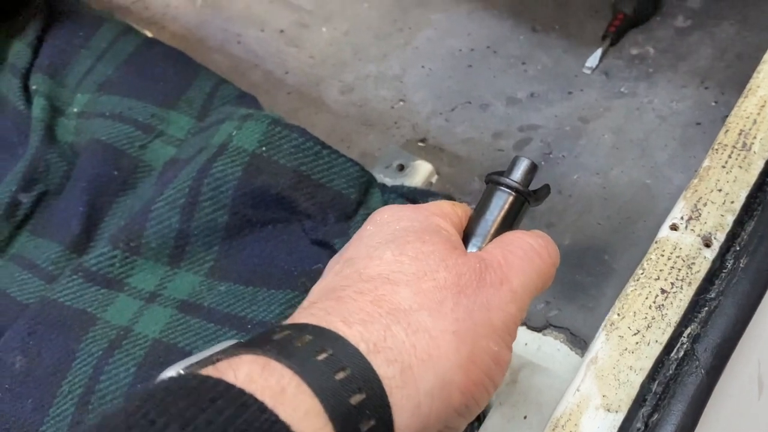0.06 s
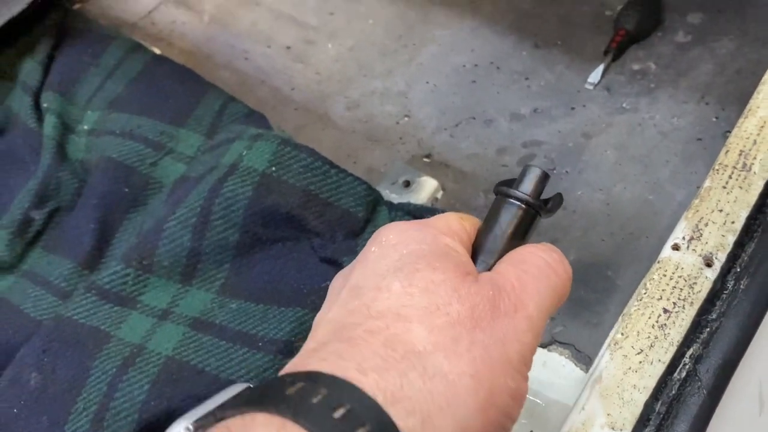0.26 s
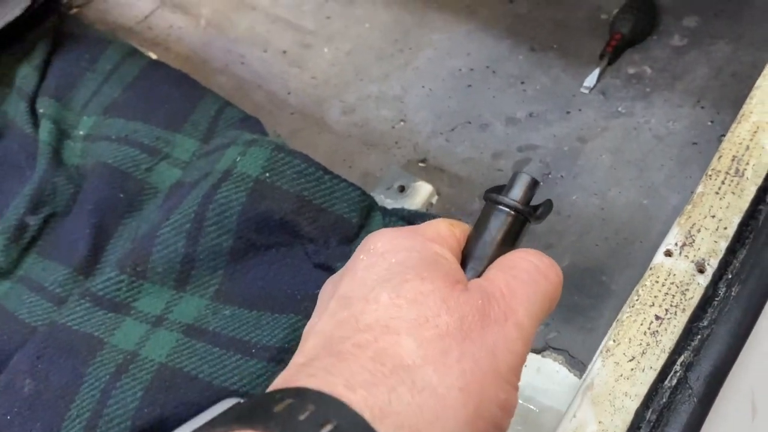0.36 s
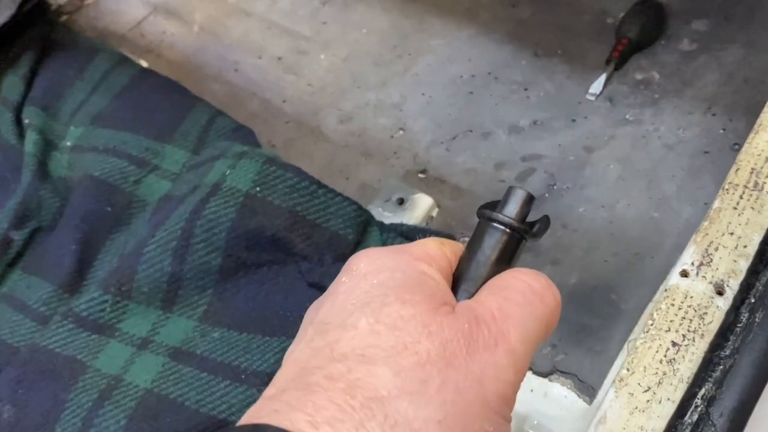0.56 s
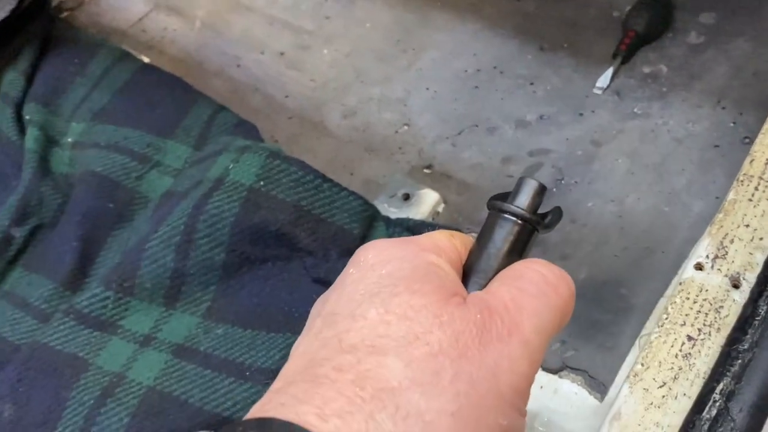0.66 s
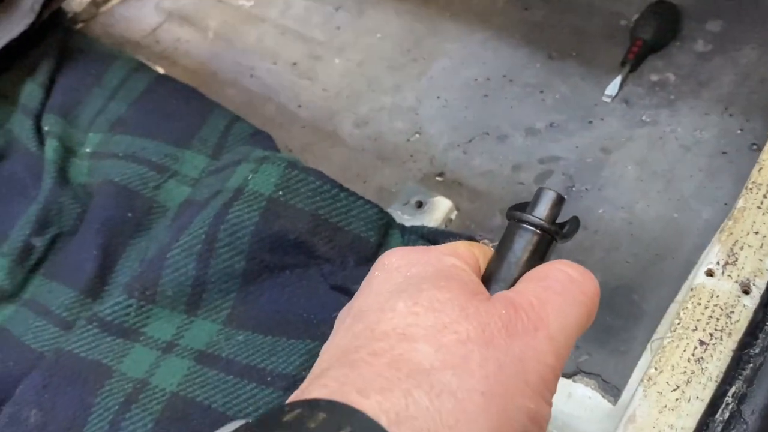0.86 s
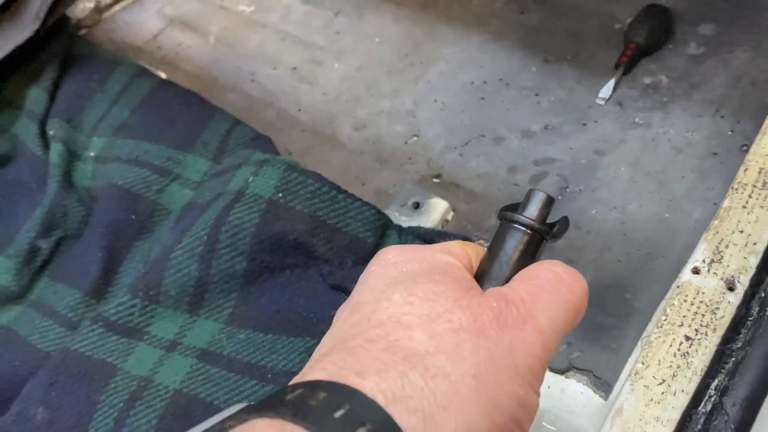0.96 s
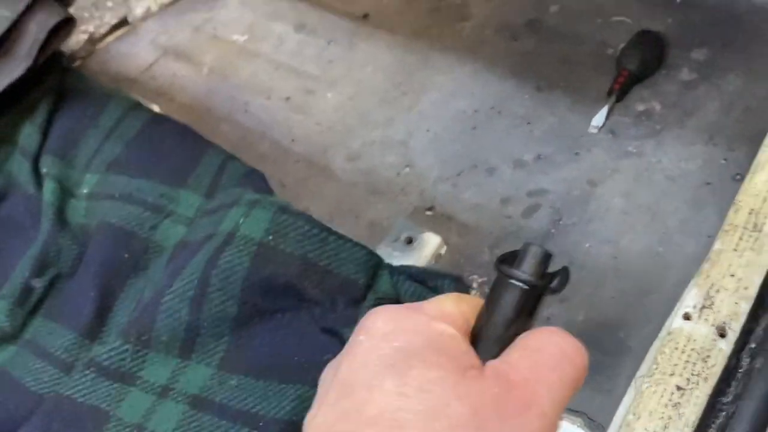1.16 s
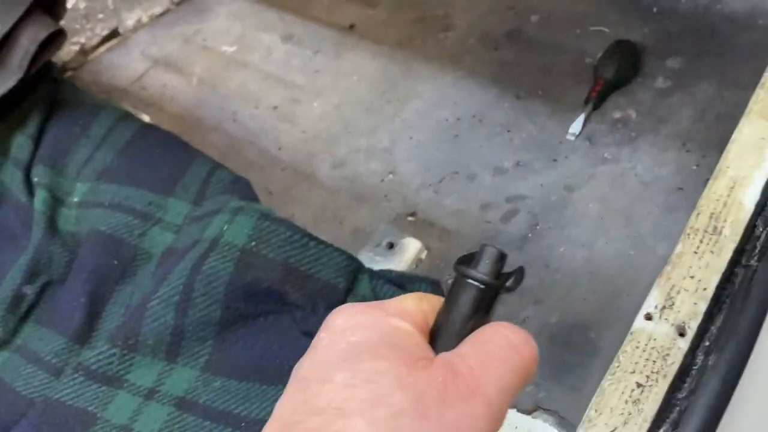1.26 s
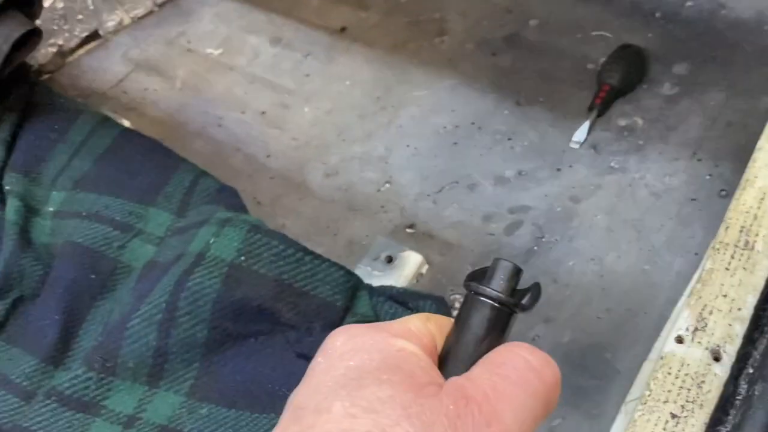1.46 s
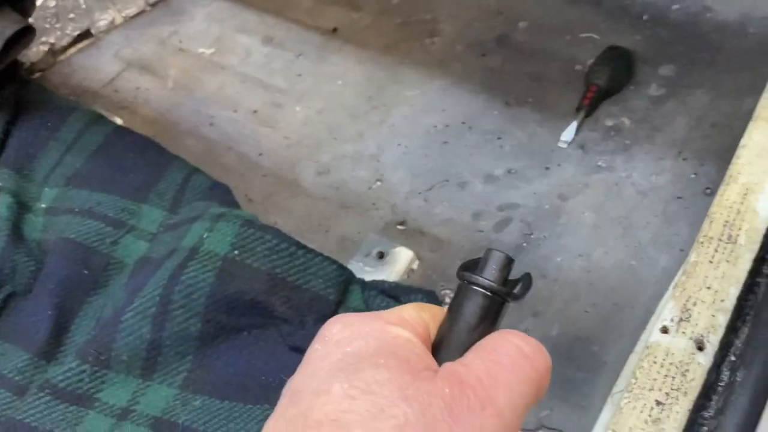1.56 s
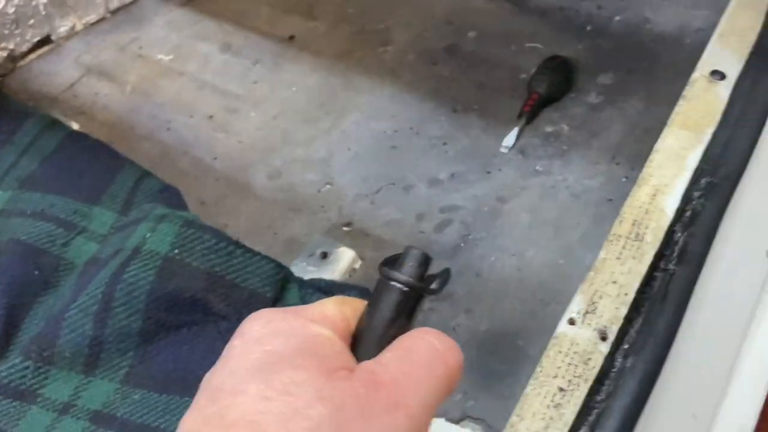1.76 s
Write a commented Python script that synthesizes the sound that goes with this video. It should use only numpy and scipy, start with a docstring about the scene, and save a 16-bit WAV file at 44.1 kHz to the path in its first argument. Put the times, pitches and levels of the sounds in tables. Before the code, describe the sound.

Close, hard metallic clack early on, its bright crack quickly damped over a hollow metal floor knock; afterwards only quiet cloth rubbing, tiny taps and low handling thuds, strongest past the middle, in a quiet workshop.

```python
"""In a workshop, a steel lever snaps over its catch once, close to a hand-held camera.
The catch rings briefly with a burst of noise, the sheet-metal floor pan booms, and the room answers.
Sleeve and blanket rustle as the arm moves, and the camera is bumped in the hand.
A few faint ticks and taps fall in between. Metal is made of decaying sines, cloth and room of shaped
noise, bumps of swelling low sines."""
import sys
import numpy as np
from scipy import signal
from scipy.fft import rfft, irfft, next_fast_len
from scipy.io import wavfile
from scipy.ndimage import uniform_filter1d, map_coordinates

SR = 44100
rng = np.random.default_rng(int(sys.argv[2]) if len(sys.argv) > 2 else 0)


def convert_level_to_amplitude(level_db):
    """Map a level in decibels to its linear amplitude factor."""
    exponent = np.asarray(level_db, float) / 20
    return 10 ** exponent


def persist_wave(psi):
    """Save psi, clipped to +-1, as 16-bit WAV."""
    counts = np.round(np.clip(psi, -1, 1) * 32767).astype(np.int16)
    wavfile.write(sys.argv[1], SR, np.atleast_2d(counts).T)


N = 79380  # samples in the scene
T = np.arange(SR // 2) / SR  # half a second of time for each short sound (s)

# cloth rustle over time, in two pieces, before CLOTH_DB and MISSING_BANDS: t/s, level/dB
RUSTLE_LEVEL = [
    [(0.0, -71.5), (0.088, -67.5), (0.144, -67), (0.152, -63.5), (0.172, -69.5), (0.192, -69), (0.22, -67)],
    [(0.44, -70.5), (0.454, -75), (0.476, -79.5), (0.48, -76.5), (0.614, -72.5), (0.636, -76.5),
     (0.72, -82), (0.75, -72), (0.788, -67), (0.936, -74), (1.086, -59.5), (1.174, -66.5), (1.25, -69),
     (1.336, -76.5), (1.348, -75), (1.378, -78), (1.408, -75), (1.424, -80.5), (1.648, -64.5), (1.8, -70.5)],
]
# relative spectrum of the cloth rustle, before MISSING_BANDS: f/Hz, level/dB
CLOTH_SPECTRUM = [(120, -35.5), (200, -5.5), (761, -4.5), (961, -9), (1680, -3.5), (3030, -11), (6200, -13),
                  (8200, -18), (10700, -48), (18000, -120)][:-2] + [(10500, -17.5), (12500, -23.5),
                  (14000, -66)]
# treble bands in which the rustle as heard is nearly silent or weaker, not due to the cloth: f/Hz, level/dB
MISSING_BANDS = [(8250, 0), (8450, -45), (9600, -45), (9800, 0), (11900, 0), (12300, -14)]
CLOTH_DB = 7.5  # added to the rustle levels
# low-mid rubbing over time: t/s, level/dB
RUBBING_LEVEL = [(0, -66), (.08, -58), (.11, -58), (.16, -57), (.22, -54), (.46, -66.5), (.58, -67.5),
                 (.72, -71), (.86, -71), (.9, -62), (.96, -69), (1.08, -63), (1.15, -60.5), (1.3, -72.5),
                 (1.45, -70), (1.52, -65.5), (1.57, -68.5), (1.67, -57), (1.74, -60.5), (1.8, -67)]
# relative spectrum of the rubbing: f/Hz, level/dB
RUBBING_SPECTRUM = [(120, -19.5), (200, 0), (400, 0.5), (900, -5.5), (1800, -14), (2500, -18.5),
                    (4000, -71)]
# handling rumble over time: t/s, level/dB
HANDLING_LEVEL = [(0, -47), (.07, -60.5), (.19, -44), (.29, -56.5), (.45, -57), (.55, -63.5), (.67, -54.5),
                  (.82, -59), (.98, -56.5), (1.1, -51.5), (1.2, -42), (1.33, -54.5), (1.43, -59),
                  (1.6, -57.5), (1.72, -45), (1.8, -55)]
# relative spectrum of the handling rumble: f/Hz, level/dB
RUMBLE_SPECTRUM = [(12, -57), (20, -18), (59, -2), (75, -1.5), (108, -7.5), (142, -10.5), (172, -21),
                   (221, -12.5), (300, -27), (390, -62.5), (660, -120)]
# how alike left and right are in the movement noises: f/Hz, correlation (-1 to 1)
LIKENESS = [(60, 0.88), (140, 0.89), (350, 0.32), (850, 0.48), (2050, -0.33), (4940, 0.4), (12000, 0.71)]
# left-right balance of the movement noises: f/Hz, left minus right level/dB
BALANCE = [(60, 1.5), (230, 0.0), (850, -2), (3180, -2.0), (12000, 1.5)]

# bumps of the camera in the hand: t/s, level/dB, f/Hz of the fundamental, extra overtone level/dB
BUMPS = [(0.131, -42, 86.5, 4), (0.169, -37, 74, 2.5), (0.199, -41, 69.4, 3), (0.341, -45.5, 59, 3.5),
         (0.502, -49.5, 61.56, -10), (0.611, -44, 72.4, -17), (0.708, -52.5, 66, -21),
         (0.906, -47.5, 73.3, 12.5), (1.142, -33, 84.5, 8), (1.165, -24.5, 74.5, 1), (1.2, -39, 75.2, 8),
         (1.235, -35.5, 68, -11), (1.279, -53.5, 80.5, 11.5), (1.364, -45.5, 89.8, 7),
         (1.69, -45.5, 88, -4.5), (1.725, -32, 84.5, -6)]
# partials of one bump: multiple of the fundamental, level/dB, cycles to the peak
BUMP_PARTIALS = [(1, -0.5, 0.78), (1.75, -9, 0.97), (2.8, -12.5, 1.1)]
# faint ticks and taps: t/s, level/dB before the attack, f/Hz, cycles to fall 20 dB
TICKS = [(.031, -43.5, 1528, 5.6), (.065, -45, 1230, 4.8), (.074, -38, 780, 1.3), (0.153, -49, 7000, 30),
         (.615, -44.5, 960, 4.3), (.882, -43.5, 618, 4), (0.894, -49.5, 338, 6.8), (0.903, -43.5, 255, 3.2),
         (0.153, -39.5, 450, 2.6), (1.117, -33.5, 996, 3.2), (1.136, -54.5, 4000, 8.9),
         (1.364, -56, 382, 1.3), (1.649, -46.5, 11000, 60), (1.655, -64, 11000, 24),
         (1.675, -45.5, 10890, 35), (1.609, -49.5, 1750, 26), (1.71, -54, 1887, 35)]

# dying away of the room: f/Hz, t60/s
ROOM_DECAY = [(150, 0.21), (500, 0.16), (1000, .26), (2000, 0.19), (4000, 0.078), (7000, .13),
              (11000, 0.023)]
# tone of the room's answer: f/Hz, level/dB
ROOM_TONE = [(150, -10), (400, -13.5), (800, -16), (1100, -13), (1800, -16), (2500, -11.5), (4000, -13),
             (11000, -14)]
ROOM_DELAY_S = .005

CLICK_S = .2404  # when the lever snaps over
# short rings of the catch, before damping: f/Hz, level/dB, t60/s, left minus right level/dB
CATCH_MODES = [(1405, -9.5, 0.12, 7.5), (1655, -15.5, 0.059, -15.5), (1750, -1.5, .03, 1),
               (1996, -5.5, 0.019, 7.5), (2230, -10.5, 0.034, -0.5), (3080, -13.5, 0.086, -0.5),
               (4000, -30.5, 0.023, 9.5), (4270, -28.5, 0.067, -3), (5330, -26.5, 0.029, 6),
               (6678, -29.5, .02, 2.5), (7556, -26.5, 0.025, -11.5), (8900, -38.5, 0.014, 12.5),
               (11000, -35, 0.016, 9.5)]
CATCH_RISE_S, CATCH_HELD_S, DAMPED_DB = 0.00066, 0.0027, -12  # the catch seats and is damped
# relative spectrum of the crack: f/Hz, level/dB
CRACK_SPECTRUM = [(300, -17), (500, 0.5), (800, -1.5), (1000, 6.5), (1800, 14), (2500, 1), (3600, -0.5),
                  (4500, 0), (6500, -4.5), (8000, -11), (11000, -26.5), (12500, -22)]
# dying away of the crack: f/Hz, t60/s
CRACK_DECAY = [(300, 0.078), (800, 0.04), (2000, .07), (4000, 0.039), (8000, .025), (11000, 0.005)]
# the blow into the pan: f/Hz, level/dB, t60/s, left minus right level/dB
THUD_MODES = [(770, -2, .04, 0)]
# rings of the floor pan, led by a low note of the room itself at 130 Hz: f/Hz, level/dB, t60/s, left minus
# right level/dB
PAN_MODES = [(130, -35, 0.17, -1), (185, -37, 0.27, -6.5), (222.1, -27.5, 0.13, -1.5),
             (254.7, -26.5, .12, 1), (288.6, -22.5, 0.11, -5.5), (363, -26, 0.21, 3), (398, -25.5, 0.14, 0),
             (450, -19, 0.11, -11), (484, -13.5, 0.1105, 6), (497.4, -14.5, .16, 6),
             (522.4, -17.5, 0.12, -7.5), (555.3, -9.5, 0.1, -5.5), (623, -26, 0.13, -13.5),
             (691, -12, .07, 1.5), (748.6, -10, .085, 6), (764, -23, 0.28, -0.5), (827, -19.5, 0.17, 0.5),
             (800, -13, 0.08, -3), (963.7, -22.5, .05, 5.5), (1202, -26, 0.12, 4.5)]
PAN_DELAY_S, PAN_RISE_CYCLES, PAN_LAG_CYCLES = 0.00058, 1.2, 1.3  # low notes of the pan arrive late
LEAD_S, SCATTER = 0.00028, 0.55  # left hears a ring first (s); left-right phase scatter (rad)
WAVER, WAVER_RATE = .45, 45  # loose parts make each ring's phase wander (rad a step, steps a second)

OVERLOAD_CEILING, OVERLOAD_KNEE = .98, 6  # a higher knee bends later


def unit(x):
    """Scales to an rms of 1."""
    return x / np.sqrt(np.mean(x ** 2) + 1e-20)


def along(points, hz):
    """Reads a curve of (f/Hz, value) on a log frequency axis."""
    f, v = np.transpose(points)
    return np.interp(np.log(hz + 1), np.log(f + 1), v)


def curve(rows):
    """Turns a level curve of one or more pieces into gain per sample."""
    s, db = np.vstack(rows).T
    return convert_level_to_amplitude(np.interp(np.arange(N) / SR, s, db))


def filtered(x, response):
    """Shapes a sound by a gain that is a function of frequency."""
    m = next_fast_len(N + 8192)
    return irfft(rfft(x, m) * response(np.fft.rfftfreq(m, 1 / SR)), m)[..., :N]


def placed(sound, s):
    """Starts a stereo sound at time s within the scene."""
    return np.pad(sound, ((0, 0), (round(s * SR), N)))[:, :N]


def rush(spectrum, patchy_db):
    """Stereo noise with patches of random gain in time and frequency; the mean of both sides has rms 1."""
    z = signal.stft(rng.standard_normal((2, N)), nperseg=256)[2]
    patches = uniform_filter1d(rng.standard_normal(z.shape[1:]), 6, 0)
    patches = uniform_filter1d(patches, 6, 1)
    pair = signal.istft(z * convert_level_to_amplitude(patchy_db * unit(patches)), nperseg=256)[1][:, :N]

    def mid_side_gain(hz):
        # the mix of mid and side sets the left-right correlation
        angle = np.arccos(np.clip(along(LIKENESS, hz), -1, 1)) / 2
        return convert_level_to_amplitude(along(spectrum, hz)) * [np.cos(angle), np.sin(angle)]

    mid, side = filtered(pair, mid_side_gain)
    both = np.array([mid + side, mid - side])
    both = filtered(both, lambda hz: convert_level_to_amplitude(np.outer([.5, -.5], along(BALANCE, hz))))
    return both / np.sqrt(np.mean(both.mean(0) ** 2))


def dying(decays):
    """Stereo noise whose every frequency dies at its own speed; the left side has energy 1."""
    hz, t, z = signal.stft(rng.standard_normal((2, len(T))), SR, nperseg=128)
    fade = convert_level_to_amplitude(-60 * t / along(decays, hz)[:, None])
    tail = signal.istft(z * fade, SR, nperseg=128)[1][:, :len(T)]
    return tail / np.linalg.norm(tail[0])


def ring(modes, rise, lag_cycles):
    """Struck metal: decaying sines with wandering phase; rise(hz) is the attack time constant in s."""
    out = np.zeros((2, len(T)))
    halves = np.array([[.5], [-.5]])
    for hz, db, t60, pan_db in modes:
        t = np.maximum(T - lag_cycles / hz + [[0], [-LEAD_S]], 0)
        drift = map_coordinates(np.cumsum(rng.standard_normal(99)), [T * WAVER_RATE])
        phase = SCATTER * rng.normal() * halves + WAVER * (drift - drift[0])
        decay = convert_level_to_amplitude(db + halves * pan_db - 60 * t / t60)
        attack = 1 - np.exp(-t / rise(hz))
        out += decay * attack * np.sin(2 * np.pi * hz * t + phase)
    return out


def handling_rumble():
    """The hand on the camera: patchy low noise that comes and goes."""
    return curve(HANDLING_LEVEL) * rush(RUMBLE_SPECTRUM, patchy_db=2.0)


def rubbing():
    """Low-mid rubbing: patchy noise that follows its own level curve."""
    return curve(RUBBING_LEVEL) * rush(RUBBING_SPECTRUM, patchy_db=3.0)


def cloth_rustle():
    """Sleeve and blanket: friction as a nearly even hiss, heard with some treble bands missing."""
    friction = rush(CLOTH_SPECTRUM, patchy_db=0.5)
    heard = filtered(friction, lambda hz: convert_level_to_amplitude(along(MISSING_BANDS, hz)))
    return convert_level_to_amplitude(CLOTH_DB) * curve(RUSTLE_LEVEL) * heard


def bumps():
    """Dull thumps through the camera body: low sines that swell and fade, nearly alike left and right."""
    out = np.zeros((2, N))
    for s, db, hz, overtone_db in BUMPS:
        for multiple, level, cycles in BUMP_PARTIALS:
            f = hz * multiple
            u = T * f / cycles  # 1 at the peak of the swell
            swell = u * np.exp(1 - u) * convert_level_to_amplitude([[.8], [-.8]])
            gain = convert_level_to_amplitude(db + level + (multiple != 1) * overtone_db)
            out += placed(-swell * gain * np.sin(2 * np.pi * f * T), s)
    return out


def ticks():
    """Small damped contacts: sines that die within some cycles, each with a random left-right lean."""
    out = np.zeros((2, N))
    for s, db, hz, cycles in TICKS:
        lean = rng.normal() * np.array([[1], [-1]])  # dB
        u = T * hz / cycles
        decay = convert_level_to_amplitude(db + lean - 20 * u)
        attack = 1 - np.exp(-8 * u)
        out += placed(decay * attack * np.sin(2 * np.pi * hz * T), s)
    return out


def room(x):
    """The workshop answers: the sound smeared by dying noise, a little late."""
    wet = placed(signal.fftconvolve(x, dying(ROOM_DECAY), axes=1), ROOM_DELAY_S)
    return filtered(wet, lambda hz: convert_level_to_amplitude(along(ROOM_TONE, hz)))


def pan_boom():
    """The sheet-metal floor pan takes the blow and booms, joined by a low note of the room; the low notes
    arrive and build up later."""
    boom = ring(THUD_MODES + PAN_MODES, lambda hz: PAN_RISE_CYCLES / hz, PAN_LAG_CYCLES)
    return placed(boom, CLICK_S + PAN_DELAY_S)


def crack():
    """The noisy edge of the snap: a dying burst, partly shared between left and right."""
    left, other = dying(CRACK_DECAY)
    burst = np.array([left, 1.1 * left + 1.5 * other])
    return filtered(placed(burst, CLICK_S + .0006), lambda hz: convert_level_to_amplitude(along(CRACK_SPECTRUM, hz)))


def catch_snap():
    """The steel catch rings freely for an instant, then is damped as it seats."""
    seated = 1 / (1 + np.exp(-np.clip((T - CATCH_HELD_S) / 0.0001, -50, 50)))  # goes from 0 to 1
    rings = ring(CATCH_MODES, lambda hz: CATCH_RISE_S, 0)
    return placed(rings * convert_level_to_amplitude(DAMPED_DB * seated), CLICK_S)


def scene():
    """The movement and small contacts around one snap of the lever and its echo in the room."""
    movement = handling_rumble() + rubbing() + cloth_rustle()
    hit = catch_snap() + crack() + pan_boom()
    return movement + bumps() + ticks() + room(hit) + hit


def low_pass(x):
    """Removes everything above the highest recorded frequency."""
    return signal.sosfilt(signal.butter(12, 12550, fs=SR, output="sos"), x)


def record(dry):
    """Soft overload: peaks bend smoothly towards a ceiling."""
    bend = (1 + np.abs(dry / OVERLOAD_CEILING) ** OVERLOAD_KNEE) ** (1 / OVERLOAD_KNEE)
    mix = dry / bend
    return low_pass(mix)


dry = scene()
out = record(dry)
persist_wave(out)
```